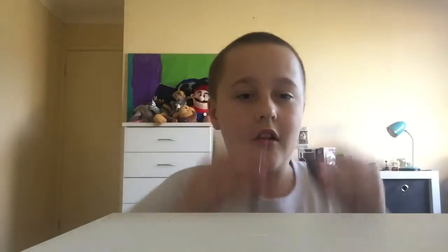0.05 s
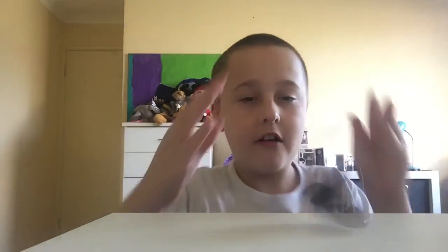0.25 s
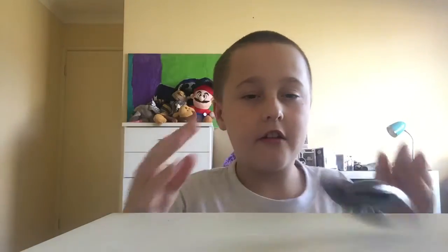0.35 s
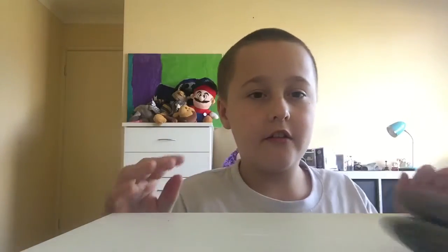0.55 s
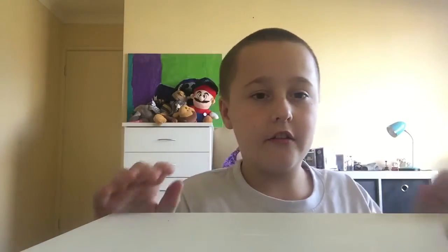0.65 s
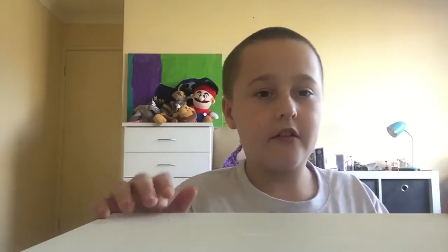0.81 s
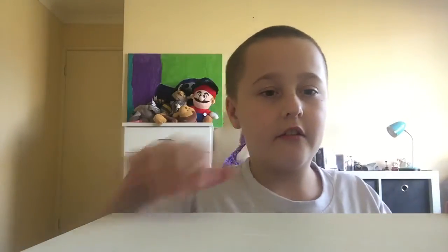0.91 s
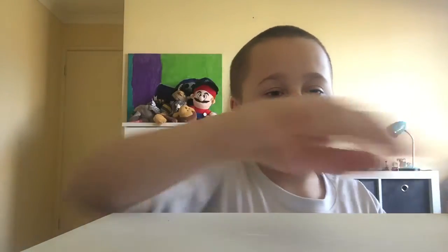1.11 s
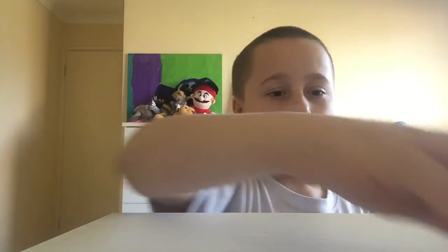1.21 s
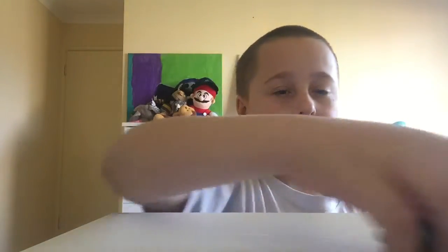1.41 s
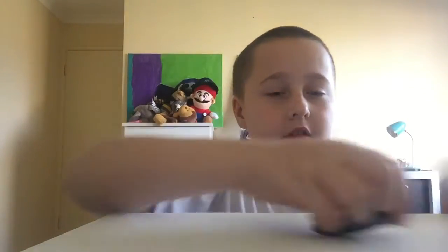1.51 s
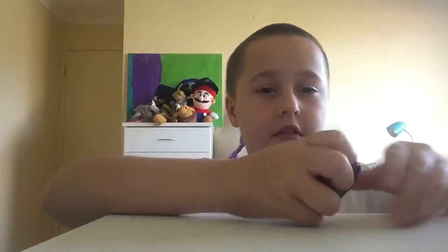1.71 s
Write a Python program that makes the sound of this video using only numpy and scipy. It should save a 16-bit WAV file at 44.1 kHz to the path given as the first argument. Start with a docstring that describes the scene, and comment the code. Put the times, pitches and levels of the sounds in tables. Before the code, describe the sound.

Two small magnets click rapidly together in midair, hit a table with a loud knock and chatter in a rising buzz. They rock to rest, then are dragged and grabbed, close to the microphone in a small, quiet room.

```python
"""Bright clacks ring out in a small, quiet room as two tossed, polished magnets collide in the air.
They land on a table, exciting its modes, and attraction makes them chatter ever faster into a buzz.
Stuck together, they tumble and rock to rest with a dull rumble; then stick-slip friction sounds the
table as they are dragged over it and grabbed by a hand. The microphone sits on the table and
overloads on the hardest knocks."""
import sys
import numpy as np
from scipy import signal
from scipy.fft import rfft, irfft
from scipy.io import wavfile

SR = 44100
rng = np.random.default_rng(int(sys.argv[2]) if len(sys.argv) > 2 else 0)


def generate_wav(signal):
    """Clip the signal to [-1, 1] and save it as 16-bit WAV at the path in sys.argv[1]."""
    frames = np.transpose(np.atleast_2d(signal))
    scaled = np.clip(frames, -1, 1) * 32767
    pcm = np.round(scaled).astype(np.int16)
    wavfile.write(sys.argv[1], SR, pcm)


N = 77175

# spectrum of one small bounce (frequency [Hz], level [dB])
BOUNCE_SPECTRUM = [(300, -20), (3000, -20), (3600, -11), (4600, -14.5), (6500, -3), (9500, 0), (15000, -16)]


def undb(db):
    """Amplitude ratio of a level in decibels."""
    return 10 ** (np.asarray(db) / 20)


def unit(x):
    """Normalisation to rms 1."""
    return x / np.sqrt(np.mean(x ** 2))


def fade(t60, size=16384):
    """Exponential damping: 60 dB in t60 seconds."""
    return np.exp(-np.log(1000) * np.arange(size) / SR / t60)


def add(out, s, x):
    """Superposition of x onto out at s seconds."""
    i = max(int(s * SR), 0)
    out[i:i + len(x)] += x[:max(len(out) - i, 0)]


def through(x, response):
    """Convolution with an impulse response."""
    return signal.fftconvolve(x, response)[:len(x)]


def colour(x, points, size=2048):
    """Minimum-phase filtering through (frequency [Hz], level [dB]) points."""
    hz, db = np.array(points, float).T
    f = np.maximum(np.fft.rfftfreq(size, 1 / SR), 1)
    cepstrum = irfft(np.log(undb(np.interp(np.log(f), np.log(hz), db))))
    cepstrum[1:size // 2] *= 2
    cepstrum[size // 2 + 1:] = 0
    return through(x, irfft(np.exp(rfft(cepstrum))))


def soften(x, hz):
    """Low-pass filtering: a softer contact excites less treble."""
    return signal.sosfilt(signal.butter(2, min(hz, SR / 2 - 1), fs=SR, output="sos"), x)


def ring(modes, scatter_db=0, detune=0, size=16384):
    """Free vibration: damped modes of alternating sign, with optional scatter in level and pitch."""
    t, chance = np.arange(size) / SR, rng.standard_normal((len(modes), 2))
    out = np.zeros(size)
    for k, ((hz, db, t60), (loud, sharp)) in enumerate(zip(modes, chance)):
        tone = np.sin(2 * np.pi * hz * (1 + detune * sharp) * t)
        out += (-1) ** k * undb(db + scatter_db * loud) * fade(t60) * tone
    return out


def burst(t60):
    """Exponentially damped white noise."""
    envelope = fade(t60)
    return envelope * rng.standard_normal(len(envelope))


def swell(curve):
    """Amplitude envelope through (time [s], level [dB]) points, silent outside them."""
    s, db = np.array(curve, float).T
    return undb(np.interp(np.arange(N) / SR, s, db, left=-np.inf, right=-np.inf))


def room_tone():
    """Ambient noise: a faint, bass-heavy floor that sinks as the scene goes on."""
    # noise spectrum (frequency [Hz], level [dB])
    spectrum = [(30, -18), (95, 0), (1500, -14.5), (15000, -31)]
    # noise envelope (time [s], level [dB])
    envelope = [(0, -64), (.8, -79.5), (1.8, -83)]
    return swell(envelope) * unit(colour(rng.standard_normal(N), spectrum))


def clacks():
    """Impulse excitation: each collision in the air starts all modes at once; the table reflects it."""
    # collisions (time [s], level [dB], gain of the low modes [dB], mode of the meeting faces [Hz])
    collisions = [(0.2361, -2, -1.5, 6160), (0.2437, 3.5, -6.5, 6230), (0.2573, -14.5, -11.5, 6800),
                  (0.2746, 4, -0.5, 6790), (0.2824, 3.5, 0, 7050), (0.2982, -0.5, 1.5, 7000),
                  (0.3039, 2.5, -0.5, 6760), (0.3191, -5.5, -5, 7450), (.3320, 1, -9, 7700),
                  (.3372, -2, -5.5, 7850), (0.351, -7.5, -6, 7800), (0.3603, -2.5, -1, 7000),
                  (0.3660, -3, -4.5, 10000)]
    # modes of the magnets (frequency [Hz], level [dB], t60 [s])
    magnet_modes = [(1410, -17, 0.0018), (2520, -14.5, 0.005), (3635, -12, 0.0055), (8927, 1, 0.0021),
                    (11560, -2.5, 0.0022), (14000, -9.5, 0.002)]
    face_db, face_t60_s, low_below_hz, detune = -0.5, 0.0027, 4500, 0.018
    reflection_s, reflection_db = 0.0015, -11.5
    out = np.zeros(N)
    for s, db, low_db, face_hz in collisions:
        modes = [(hz, level + low_db * (hz < low_below_hz), t60) for hz, level, t60 in magnet_modes]
        modes.append((face_hz, face_db, face_t60_s))
        clack = undb(-20) * colour(burst(t60=0.033), BOUNCE_SPECTRUM)  # grit under the ring
        t = np.arange(len(clack)) / SR
        onset = np.where(t > 0, 1, .5)
        for (hz, level, t60), sharp in zip(modes, rng.standard_normal(len(modes))):
            clack += undb(level) * fade(t60) * np.cos(2 * np.pi * hz * (1 + detune * sharp) * t) * onset
        clack = undb(db) * soften(clack, hz=15000)
        add(out, s, clack)
        add(out, s + reflection_s, undb(reflection_db) * clack)
    return out


def reverberation(x):
    """Diffuse field: the room's reflections build up, then decay at their own rate in each band."""
    # reverberant bands (centre frequency [Hz], level [dB], t60 [s])
    bands = [(95, -30.5, 0.13), (235.5, -26, 0.27), (695.6, -25.5, 0.18), (1850, -24, 0.21),
             (4900, -24.5, 0.38), (11500, -14.5, 0.44)]
    centres = np.array(bands)[:, 0]
    edges = np.r_[20, np.sqrt(centres[1:] * centres[:-1]), SR / 2]
    f, t, tail = np.fft.rfftfreq(N, 1 / SR), np.arange(N) / SR, np.zeros(N)
    build_up = 1 - np.exp(-(t / 0.0023) ** 2)
    for lo, hi, (_, db, t60) in zip(edges, edges[1:], bands):
        noise = irfft(rfft(rng.standard_normal(N)) * (f > lo) * (f <= hi), N)
        band = noise * fade(t60, size=N) * build_up
        tail += undb(db) * band / np.linalg.norm(band)
    return through(x, tail)


def knocks():
    """Modal response of a struck plate: the table rings and thumps under a tick of contact."""
    # impacts (time [s], level [dB], hardness cutoff [Hz], relative thump [dB], tick level [dB],
    # pitch the struck spot favours [Hz], share of the ring time left by the contact [ratio])
    impacts = [(0.345, -16.5, 1210, -19, -47, 690, 0.64), (0.3679, 18, 1180, 4.5, 3, 670, 0.67),
               (0.3758, 8.5, 990, -1, -28, 600, 0.74), (0.3875, 9, 1110, -15, -24, 704, 1),
               (0.4036, -3.5, 2100, -12, -17, 981, 0.67), (0.4891, 3.5, 1118, -18, -24, 613, 0.88),
               (0.5212, -7.5, 2040, -28, -23.5, 1160, 0.73), (0.5694, -11.5, 1190, -19, -40, 402, 0.66),
               (0.575, -12, 1960, -25, -55, 1180, 1), (0.592, -15, 1160, -34, -40, 380, 0.83),
               (.601, -15.5, 1080, -20, -55, 330, 1), (0.647, -17, 1000, -14, -58, 402, 1),
               (.6720, 4.5, 2450, -31.5, -12, 1120, 0.64), (0.689, -3.5, 940, -30, -37, 545, 1),
               (0.706, -4.5, 1150, -33, -29, 799, 0.66), (0.7161, -8, 1100, -18, -45, 784, 0.98),
               (0.754, -2, 1092, -24, -25.5, 595, .8), (.7685, -23.5, 2500, -16, -35.5, 1800, 0.48),
               (0.7964, -20.5, 1600, -22, -43, 348, 0.85), (0.806, -19, 1000, -12.5, -48, 333, 0.63),
               (.8160, -23, 793, -3, -52, 301.3, 1), (1.333, -25, 600, 1.5, -65, 281.7, 1),
               (1.426, -13, 610, -29, -65, 360, 1), (1.5854, -10, 2570, -25, -33.5, 2200, 0.54),
               (1.587, 3, 524, -11, -55, 320, 0.86), (1.605, -6.5, 444, -25, -59, 315, 0.8),
               (1.665, -15, 800, -28, -57, 686, 0.61)]
    # modes of the table (frequency [Hz], level [dB], t60 [s])
    table_modes = [(214, -16, 0.41), (291.2, -15, 0.15), (329.8, -11, 0.077), (401, -15, 0.14),
                   (438.4, -7, 0.087), (579.7, -7.5, 0.046), (614, -15, 0.027), (718, 1, 0.037),
                   (900, -18, 0.04), (1065, -1, 0.04), (1196, -1, 0.037), (1258, -7.5, 0.041),
                   (1651, -6.5, 0.047), (1820, -15.5, 0.034), (2180, -10, 0.045), (2648, -10, 0.024)]
    # sway of the whole table (frequency [Hz], level [dB], t60 [s])
    sway_modes = [(64, -18, 0.065), (124, -33, 0.097)]
    # dense rattle of the board (frequency [Hz], level [dB])
    rattle_spectrum = [(100, -13), (250, 9), (700, 6.5), (1200, 3), (2400, -1), (3300, -10.5), (4800, -23),
                       (9000, -40.5)]
    knock_db, rattle_db, spot_db_per_octave = -3, 5, 7.5
    out = np.zeros(N)
    for s, db, hard_hz, thump_db, tick_db, spot_hz, ring_share in impacts:
        modes = [(hz, level - spot_db_per_octave * abs(np.log2(hz / spot_hz)), ring_share * t60)
                 for hz, level, t60 in table_modes]
        board = ring(modes, scatter_db=1.2, detune=.006)
        board += undb(rattle_db) * colour(burst(t60=ring_share * .024), rattle_spectrum)
        thump = undb(thump_db) * ring(sway_modes)
        add(out, s, undb(knock_db + db) * (soften(board, hard_hz) + thump))
        add(out, s, undb(tick_db) * colour(burst(t60=0.0048), BOUNCE_SPECTRUM))
    return out


def rocking():
    """Rolling noise: the pair's dull rumble swells into a soft bump at each half turn."""
    # rumble envelope (time [s], level [dB])
    envelope = [(.36, -33), (.42, -34), (.62, -34.5), (.72, -34.5), (.82, -52), (.86, -52.5), (1.0, -62.5),
                (1.1, -68), (1.3, -65), (1.36, -37.5), (1.74, -55.5)]
    # rumble spectrum (frequency [Hz], level [dB])
    spectrum = [(40, -43), (85, -37), (125, -2.5), (165, -10.5), (215, 6), (300, 5), (460, -2),
                (570, -25.5), (740, -8.5), (950, -25), (1750, -30.5), (2100, -21), (2700, -44),
                (3500, -53.5), (9000, -60)]
    # bumps of the joined pair (time [s], level [dB], hardness cutoff [Hz])
    half_turns = [(.882, -40, 2590), (.942, -43, 2382), (1.001, -45.5, 1980), (1.062, -51.5, 2016),
                  (1.122, -56, 1400), (1.187, -51.5, 1303), (1.254, -54.5, 1504)]
    t, width_s = np.arange(N) / SR, 0.013
    rumble = unit(colour(rng.standard_normal(N), spectrum))
    bumps = sum(undb(db) * np.exp(-((t - s) / width_s) ** 2) * soften(rumble, hz)
                for s, db, hz in half_turns)
    return swell(envelope) * rumble + bumps


def buzz(size=16):
    """Inelastic bouncing: attraction shortens the bounces until the clicks fuse into a pitch and die."""
    # course of the buzz; the table's reflection shifts as the pair turns
    # (time [s], level [dB], reflection lag [s], reflection gain [dB], treble cutoff [Hz])
    course = [(.385, -12, 0.00034, -6, 13000), (.48, -13, 0.00031, -4.5, 14000),
              (0.522, -8.5, .00012, -15, 15000), (0.57, -15, 0.000081, -10, 12000),
              (0.593, -35, 0.00012, -13.5, 10000)]
    # pace, wavering as the pair turns (time [s], bounce rate [1/s])
    pace = [(.385, 242), (.402, 275), (.411, 225), (.423, 224), (.433, 264), (.448, 282), (.463, 250),
            (.476, 347), (.485, 294), (.498, 340), (.51, 395), (.519, 460), (.528, 450), (.538, 505),
            (.549, 520), (.566, 620), (.573, 1200), (.582, 930), (.594, 2200)]
    gain_db, scatter_db, jitter = 10, 0.8, 0.012
    times, *controls = np.array(course).T
    out, s, taps = np.zeros(N), times[0], np.arange(size) - size // 2
    for late, loud in rng.standard_normal((N // 100, 2)):
        if s > times[-1]:
            break
        db, lag, reflection_db, edge_hz = (np.interp(s, times, column) for column in controls)
        for arrival, path_db in ((s, 0), (s + lag, reflection_db)):
            impulse = np.sinc(taps - arrival * SR % 1) * np.hanning(size)  # timed between samples
            click = soften(np.pad(impulse, (0, size)), edge_hz)
            add(out, arrival, click * undb(gain_db + db + path_db + scatter_db * loud))
        s += (1 + jitter * late) / np.interp(s, *np.array(pace).T)
    return colour(out, BOUNCE_SPECTRUM)


def drag(envelope, modes, scrape_db, edge_hz):
    """Stick-slip friction: tiny random slips excite the table's resonances, with a faint dry scrape."""
    slips_per_s, spread_db, band_hz = 7000, 1, (146, 3200)
    slipping = rng.random(N) < slips_per_s / SR
    slips = slipping * rng.standard_normal(N) * undb(spread_db * rng.standard_normal(N))
    bandpass = signal.butter(3, band_hz, "bandpass", fs=SR, output="sos")
    body = signal.sosfilt(bandpass, through(slips, ring(modes)))
    # scrape spectrum (frequency [Hz], level [dB])
    spectrum = [(500, -30), (2500, 14), (5000, -3.5), (7000, 8), (9500, 11.5), (12000, 5), (15500, -9)]
    scrape = soften(colour(slips, spectrum), edge_hz)
    return swell(envelope) * (unit(body) + undb(scrape_db) * unit(scrape))


def hand_drags():
    """Forced vibration: two drags of the pair drive the table, each with its own resonances."""
    # envelope of each drag (time [s], level [dB])
    first_envelope = [(1.31, -74.5), (1.338, -31.5), (1.36, -57), (1.41, -37), (1.44, -28.5),
                      (1.475, -23.5), (1.525, -24), (1.54, -32), (1.546, -40), (1.58, -43)]
    second_envelope = [(1.585, -39), (1.598, -16.5), (1.62, -30), (1.64, -24.5), (1.658, -30.5),
                       (1.668, -27.5), (1.69, -32), (1.708, -27.5), (1.722, -41), (1.75, -50)]
    # resonances of each drag (frequency [Hz], level [dB], t60 [s])
    first_modes = [(267.4, 0, 0.091), (401, 3.5, 0.061), (761, -3, 0.032), (1097, -6, 0.05),
                   (1460, -5.5, 0.006), (1670, -15, 0.031), (2134, -3, 0.015), (3160, -30, 0.016)]
    second_modes = [(250, -10, 0.081), (429, 2.5, 0.041), (653, 12, 0.025), (970, 4.5, 0.013),
                    (1094, 1, 0.021), (1810, -2.5, 0.0059), (2350, -4.5, 0.011), (3740, -16.5, 0.018)]
    first = drag(first_envelope, first_modes, scrape_db=-31, edge_hz=16000)
    second = drag(second_envelope, second_modes, scrape_db=-34.5, edge_hz=13000)
    return first + second


def scene():
    """Direct and reverberant sound add; the buzz lies close to the microphone and stays drier."""
    near = buzz()
    table = knocks() + rocking() + hand_drags()
    in_flight = clacks()
    reverberant = reverberation(in_flight + undb(-1.5) * table + undb(-8.5) * near)
    return (in_flight + table + near + reverberant + room_tone())[None]


def record(dry):
    """Band limiting and overload: the lowest bass is filtered away, the microphone clips at full scale and cuts
    the top."""
    low_cut = signal.butter(3, 58, "highpass", fs=SR, output="sos")
    top_cut = signal.ellip(10, .1, 70, 15900, fs=SR, output="sos")
    clipped = np.clip(signal.sosfilt(low_cut, dry), -1, 1)
    return signal.sosfilt(top_cut, clipped)


dry = scene()
out = record(dry)
generate_wav(out)
```